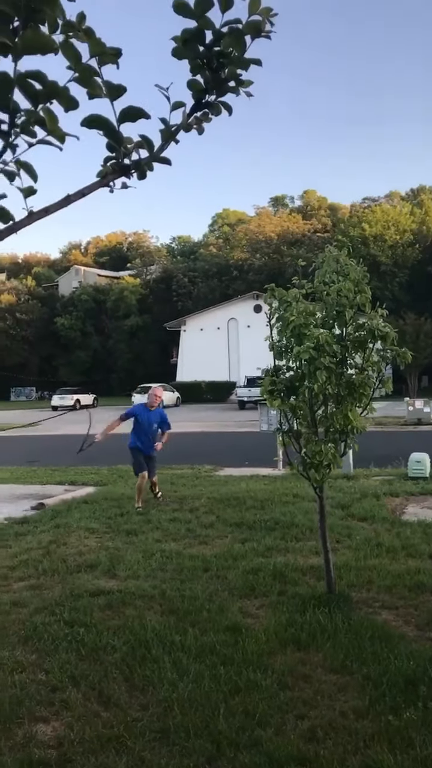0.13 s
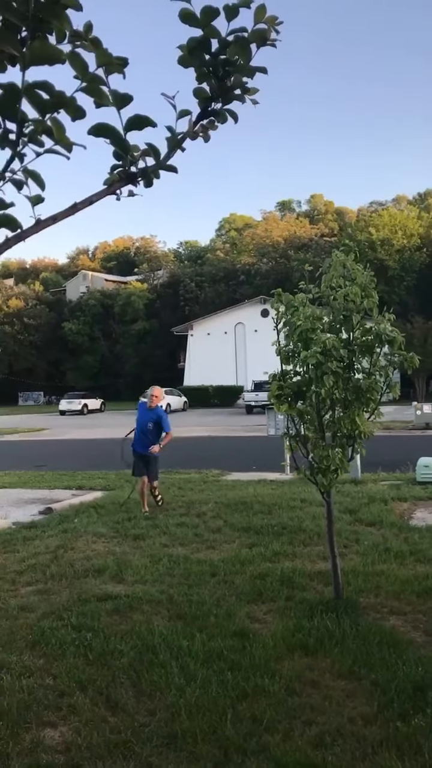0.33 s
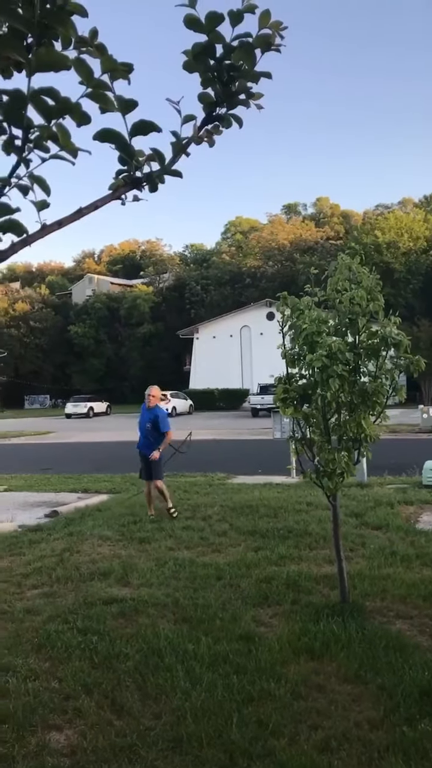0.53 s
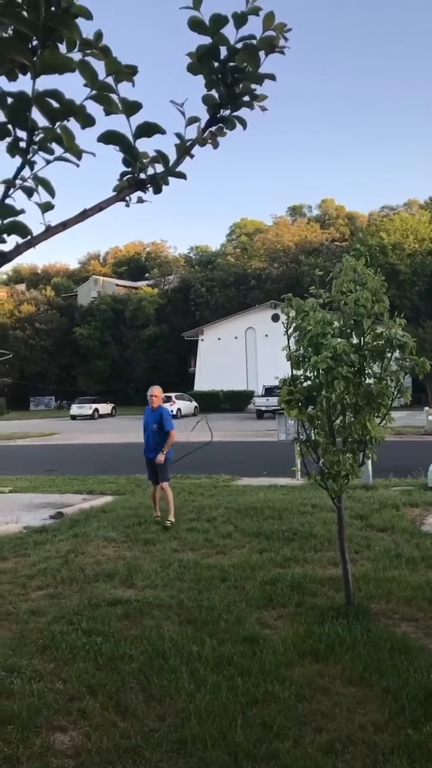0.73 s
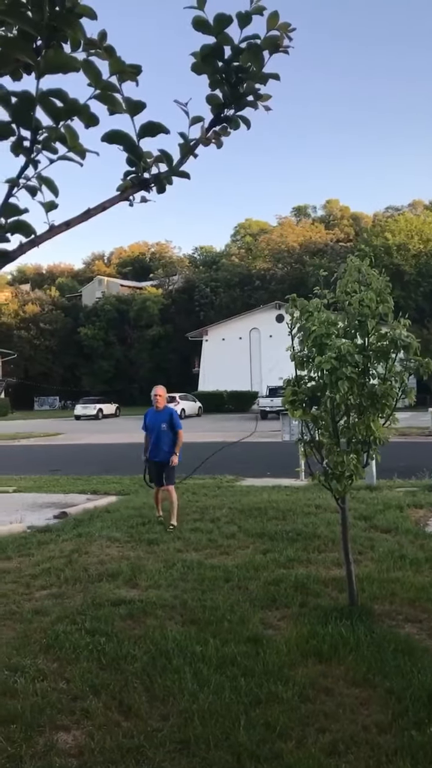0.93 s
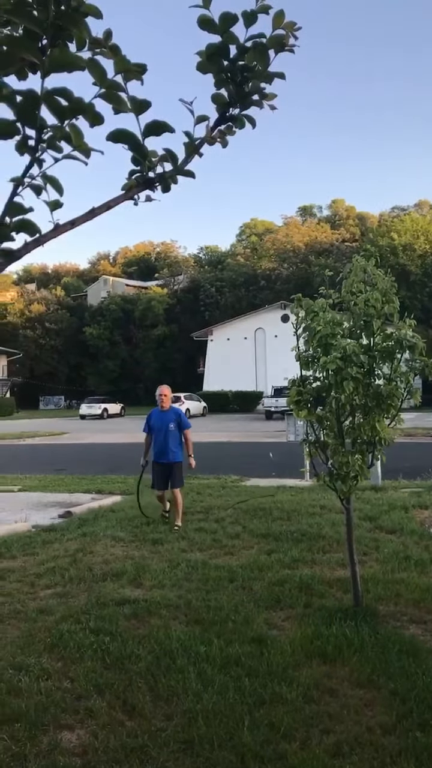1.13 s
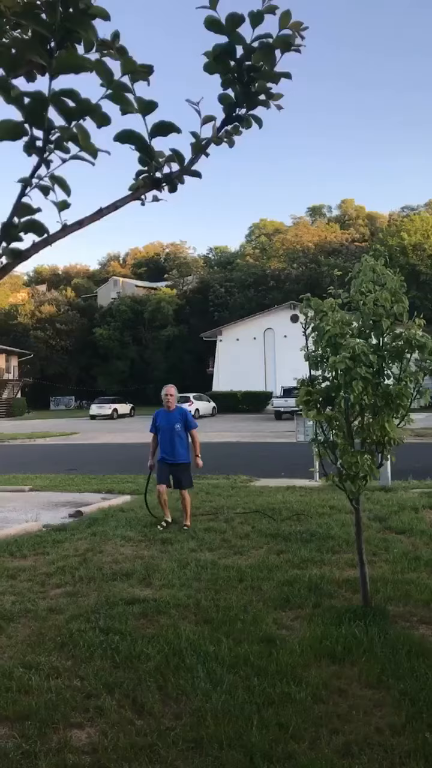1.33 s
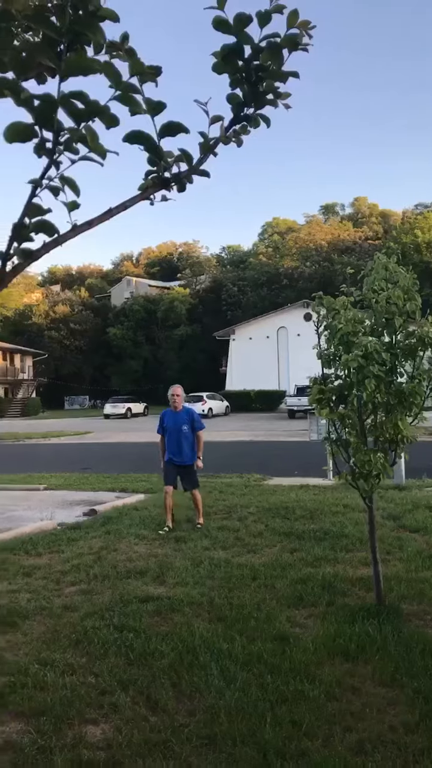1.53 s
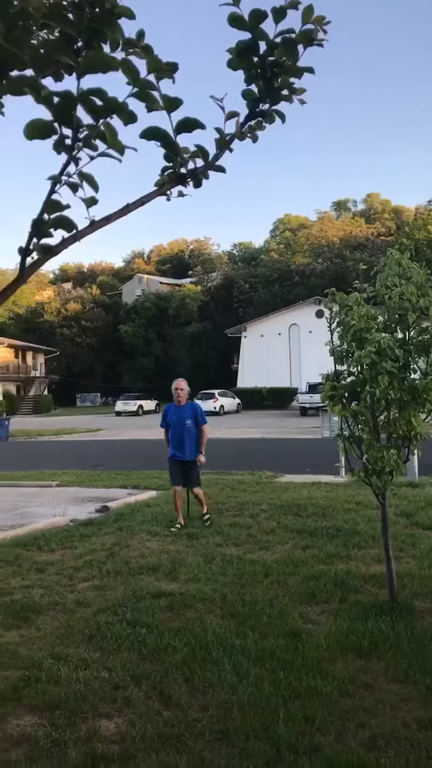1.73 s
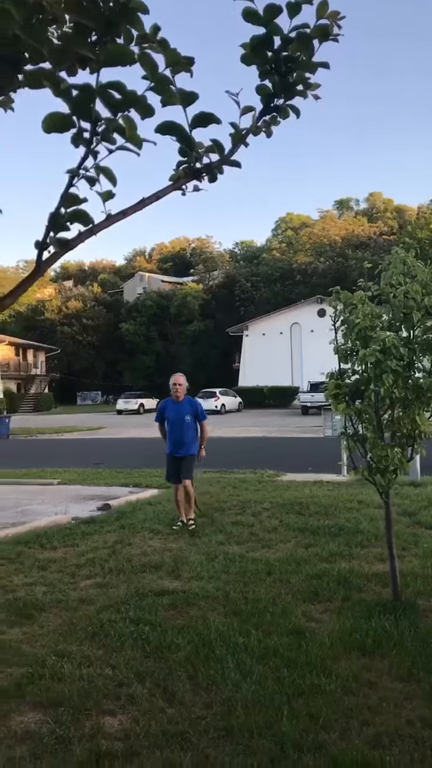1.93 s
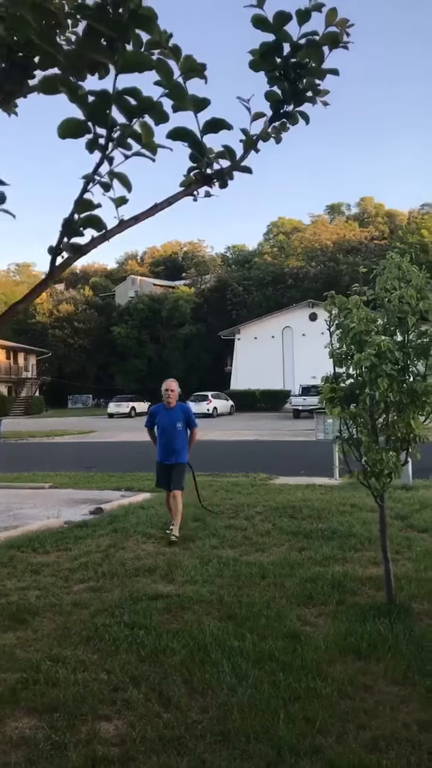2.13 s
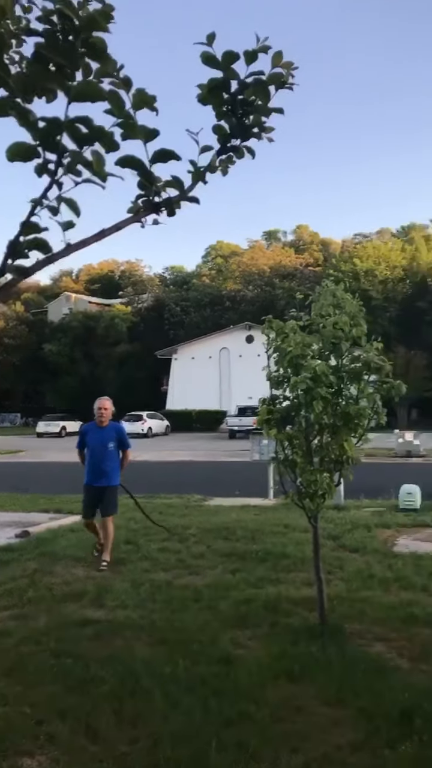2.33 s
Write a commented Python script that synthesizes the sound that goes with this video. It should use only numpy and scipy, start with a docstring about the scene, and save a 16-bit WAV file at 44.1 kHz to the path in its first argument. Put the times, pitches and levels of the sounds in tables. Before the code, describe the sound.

One loud whip crack in an open yard, then a hard wall echo and short fading reverberation

```python
"""A whip cracks once on a lawn, some metres from a phone: an N-shaped shock off the tip, doubled by a ground bounce.
The lash swishes just before, as shaped noise. Noise also forms the scatter off lawn and street, and the far echoes
of houses and trees, duller with time; a few short slaps come off single walls. Behind lie outdoor rumble, traffic
drones and a faint gliding bird whistle; grass rustles, a scuff and ticks are brief bands of noise.
The phone's gain control ducks everything at the crack, holds, then lets the level return steadily."""
import sys
import numpy as np
from scipy import signal
from scipy.fft import rfft, irfft
from scipy.io import wavfile
from scipy.ndimage import uniform_filter1d, minimum_filter1d

SR = 44100
rng = np.random.default_rng(int(sys.argv[2]) if len(sys.argv) > 2 else 0)


def transcribe(signal):
    """Save signal, clipped to [-1, 1], as a 16-bit WAV file at the path in sys.argv[1]."""
    frames = np.atleast_2d(signal).T
    limited = np.clip(frames, -1, 1)
    pcm = np.round(limited * 32767).astype(np.int16)
    wavfile.write(sys.argv[1], SR, pcm)


N = 110205

# All levels stand ahead of the phone's gain control. Colours are relative: each noise is scaled to rms 1.

# colour of the distant rumble and wind: columns [frequency_hz, density_db]
RUMBLE_COLOUR = [(15, -22), (28, -6), (38, 1), (58, 2), (100, -6), (220, -4.5), (360, -10.5), (530, -19),
                 (900, -19), (1700, -29.5), (2600, -35.5), (4300, -45), (5700, -43), (7500, -47),
                 (15500, -53)]
# rumble level over time, added to RUMBLE_DB: columns [time_s, level_db]
RUMBLE_COURSE = [(0, -1), (.9, 3.5), (1.3, 5.5), (1.6, 0), (1.9, -1.5), (2.4, -1)]
# gain of the rumble's low mids over time: columns [time_s, gain_db]
LOW_MID_COURSE = [(0, -7), (1.1, -2.5), (1.55, -0.5), (2.2, -3), (2.5, -3)]
RUMBLE_DB, WAVER_DB = -39.5, 0.6
LOW_MID_HZ, LOW_MID_WIDTH_OCT = 252, 0.79

# drones of far traffic: columns [peak_s, level_db, rise_s, fall_db_per_s, pitch_hz, width_octaves]
TRAFFIC_DRONES = [(1.52, -48.5, .13, 22.5, 355.1, .015), (2.2, -46, 0.15, 57, 223, .09)]

# faint bird chirps: columns [middle_s, level_db, width_s, pitch_hz]
BIRD_CHIRPS = [(2.197, -66, 0.0091, 3270), (2.243, -57, 0.012, 3400)]
CHIRP_GLIDE_HZ_PER_S, CHIRP_WOBBLE_HZ = -2000, 130  # the wobble is an rms

# soft rustles of grass and leaves: columns [peak_s, level_db, rise_s, fall_db_per_s]
GRASS_RUSTLES = [(.08, -64, .03, 30), (.97, -51, 0.043, 52), (1.07, -43.5, .04, 88), (1.25, -58.5, .02, 70),
                 (1.47, -59.5, 0.045, 195), (1.79, -68, .03, 100), (1.94, -67.5, 0.017, 153),
                 (2.37, -60, 0.011, 163)]
# colour of the rustles: columns [frequency_hz, density_db]
RUSTLE_COLOUR = [(1500, -31), (4000, -6), (5600, 5.5), (7500, -4), (10000, -3.5), (12000, 2), (15500, -3)]
# thin brush of the lash over grass: columns [peak_s, level_db, rise_s, fall_db_per_s]
LASH_BRUSH = [(1.11, -46, .014, 300)]
BRUSH_HZ, BRUSH_WIDTH_OCT = 5440, .06
# colour of the scuff: columns [frequency_hz, density_db]
SCUFF_COLOUR = [(600, -29), (1400, -6.5), (3300, 5.5), (4500, -3), (6000, -3.5), (8600, -3), (10500, -12.5),
                (15000, -12)]
SCUFF_S, SCUFF_LENGTH_S, SCUFF_DB, SCUFF_DECAY_S = 2.312, 0.023, -43.5, 0.0083
# small ticks and snaps: columns [start_s, level_db, centre_hz, width_octaves, decay_s]
SMALL_TICKS = [(1.0585, -29, 4200, .55, 0.0025), (1.787, -56, 9000, 0.79, 0.0018),
               (1.947, -51, 2700, 0.53, 0.0035), (2.0257, -57, 3500, 0.8, .003),
               (2.3712, -36, 1600, 0.54, 0.0033), (2.438, -51, 7500, .5, 0.0017)]

# wide echoes from houses and the wooded hill: columns [peak_s, level_db, rise_s, fall_db_per_s]
WIDE_ECHOES = [(.50, -20.5, 0.036, 45), (.585, -22, 0.041, 90), (.67, -28, 0.031, 35), (.83, -29, .06, 47),
               (1.02, -27.5, .05, 81)]
# colour of the wide echoes: columns [frequency_hz, density_db]
ECHO_COLOUR = [(150, -23), (500, -24), (900, -14.5), (1400, -6), (2200, -0.5), (2900, -1.5), (4000, -14.5),
               (5800, -14), (9000, -21), (15000, -29)]
# sharp returns from single walls: columns [start_s, level_db, decay_s]
WALL_SLAPS = [(.378, -7, 0.0038), (0.466, -24, 0.0041), (.583, -17, 0.0045), (.664, -25, .004),
              (0.822, -28, .004)]
SLAP_HZ, SLAP_WIDTH_OCT = 2000, 0.51
ECHO_FLICKER_DB, ECHO_FLICKER_HZ = 1, 45
AIR_DB_PER_S_KHZ = 6.5  # treble lost on the way to far reflectors

# colour of the scattered crack: columns [frequency_hz, density_db]
SCATTER_COLOUR = [(40, -10), (150, -17), (400, -13), (750, -8.5), (1200, -4), (2100, 1.5), (2800, 0),
                  (3500, -6), (4300, -14.5), (5800, -8.5), (7500, -15.5), (9200, -12), (10700, -19),
                  (15500, -16.5)]
LAWN_DB, LAWN_HOLD_S, LAWN_FALL_DB_PER_S = 0.7, 0.04, 379
STREET_DB, STREET_HOLD_S, STREET_FALL_DB_PER_S = -13.5, 0.11, 231
SCATTER_GRAIN, TREBLE_FALL_DB_PER_S_KHZ = 0.067, 8

# air torn by the lash just before the crack: columns [middle_s, level_db, width_s]
LASH_SWISHES = [(.2375, -27, 0.0014), (.2475, -29, .0018), (0.2374, -41.5, .008)]
# colour of the swish: columns [frequency_hz, density_db]
SWISH_COLOUR = [(60, 8), (300, -4), (800, 0.5), (2400, -1.5), (4000, -17), (9000, -14), (16000, -25)]

# the shock at the microphone: arrival, length of the N wave, peak of the whole
CRACK_S, SHOCK_MS, SHOCK_DB = .2499, .33, 14
GROUND_LAG_S, GROUND_DB = .0018, -1.5  # bounce relative to the direct path
MIC_RING_HZ, MIC_Q = 2200, 2.4
SHOCK_EDGE_DB, EDGE_RISE_HZ = -10, 7000  # share beside the ring; it rises above this frequency

# the phone
LIMIT_DB, HOLD_S, RECOVER_DB_PER_S = -2.8, 0.56, 17.5
TOP_HZ = 15550


def undb(db):
    """Amplitude ratio of a level in dB."""
    return 10 ** (np.asarray(db) / 20)


def clock():
    """Time of every sample, s."""
    return np.arange(N) / SR


def freqs():
    """Frequency of every spectral bin, Hz, at least 1."""
    return np.maximum(np.arange(N // 2 + 1) * SR / N, 1)


def noise(colour, grain=0):
    """Coloured noise of rms 1; grain makes its samples more uneven, like a mass of clicks."""
    hz, db = np.array(colour).T
    white = rng.standard_normal(N) * np.exp(grain * rng.standard_normal(N))
    gain = undb(np.interp(np.log(freqs()), np.log(hz), db))
    y = irfft(rfft(white) * gain, N)
    return y / y.std()


def bell(x, hz, octaves):
    """Keeps a bell-shaped band around hz."""
    gain = np.exp(-.5 * (np.log2(freqs() / hz) / octaves) ** 2)
    return irfft(rfft(x) * gain, N)


def band(hz, octaves):
    """Noise of rms 1 in one bell-shaped band."""
    y = bell(rng.standard_normal(N), hz, octaves)
    return y / y.std()


def dull(x, db_per_khz, count=14):
    """Tilts the sound towards the bass about 2 kHz, by an amount that changes in time."""
    centres = np.geomspace(200, 16000, count)
    spectrum = rfft(x)
    out = 0
    for hz, share in zip(centres, np.eye(count)):
        # overlapping triangular bands add up to the whole spectrum
        part = irfft(spectrum * np.interp(freqs(), centres, share), N)
        out = out + part * undb(-db_per_khz * (hz / 1e3 - 2))
    return out


def burst(start, decay):
    """Sudden start, exponential decay."""
    age = clock() - start
    return (age >= 0) * np.exp(-np.abs(age) / decay)


def hump(middle, width):
    """Smooth rise and fall about a middle, Gaussian in time."""
    return np.exp(-.5 * ((clock() - middle) / width) ** 2)


def swells(rows):
    """Overlapping swells summed in power, each with a smooth rise and a steady fall in dB."""
    power = 0
    for peak, db, rise, fall in rows:
        age = clock() - peak
        falling = undb(db - fall * np.maximum(age, 0))
        rising = np.exp(-.5 * (np.minimum(age, 0) / rise) ** 2)
        power = power + (falling * rising) ** 2
    return np.sqrt(power)


def outdoors(count=24):
    """Low rumble of wind and far traffic: coloured noise with moving low mids and a slight waver."""
    t = clock()
    air = noise(RUMBLE_COLOUR)
    low_mid_gain = undb(np.interp(t, *np.array(LOW_MID_COURSE).T))
    air = air + bell(air, LOW_MID_HZ, LOW_MID_WIDTH_OCT) * (low_mid_gain - 1)
    waver = np.interp(t, np.linspace(0, t[-1], count), rng.standard_normal(count))
    course = np.interp(t, *np.array(RUMBLE_COURSE).T)
    return air * undb(RUMBLE_DB + course + WAVER_DB * waver)


def traffic():
    """Far low drones: narrow noise bands that swell and fade."""
    return sum(swells([swell]) * band(hz, octaves) for *swell, hz, octaves in TRAFFIC_DRONES)


def bird():
    """Short whistles: sines whose pitch falls slightly, with a quick irregular wobble."""
    out = 0
    wobble = CHIRP_WOBBLE_HZ * band(120, 1)
    for middle, db, width, hz in BIRD_CHIRPS:
        pitch = hz + CHIRP_GLIDE_HZ_PER_S * (clock() - middle) + wobble
        phase = 2 * np.pi * np.cumsum(pitch) / SR
        out = out + undb(db) * hump(middle, width) * np.sqrt(2) * np.sin(phase)
    return out


def rustles():
    """Grass and leaves: swells of grainy noise, with one thin brush of the lash in a narrow band."""
    grass = swells(GRASS_RUSTLES) * noise(RUSTLE_COLOUR, grain=.55)
    return grass + swells(LASH_BRUSH) * band(BRUSH_HZ, BRUSH_WIDTH_OCT)


def scuff():
    """One brief scuff: grainy noise with a quick onset, a plateau and a short decay."""
    age = clock() - SCUFF_S
    decay = np.exp(-np.maximum(age - SCUFF_LENGTH_S, 0) / SCUFF_DECAY_S)
    return undb(SCUFF_DB) * np.clip(age / 0.0016, 0, 1) * decay * noise(SCUFF_COLOUR, grain=0.47)


def ticks():
    """Small ticks and snaps: noise bands that start suddenly and die within milliseconds."""
    return sum(undb(db) * burst(start, decay) * band(hz, octaves)
               for start, db, hz, octaves, decay in SMALL_TICKS)


def echoes():
    """Far houses and trees return the crack as flickering swells and short slaps, duller with time."""
    flicker = undb(ECHO_FLICKER_DB * band(ECHO_FLICKER_HZ, 0.88))
    wash = swells(WIDE_ECHOES) * flicker * noise(ECHO_COLOUR, grain=0.6)
    slap_level = sum(undb(db) * burst(start, decay) for start, db, decay in WALL_SLAPS)
    slaps = band(SLAP_HZ, SLAP_WIDTH_OCT) * slap_level
    return dull(wash + slaps, AIR_DB_PER_S_KHZ * np.maximum(clock() - CRACK_S, 0))


def scatter():
    """Dense returns off the lawn, and weaker, longer ones off the street; the treble falls faster."""
    age = clock() - CRACK_S
    late = np.maximum(age - LAWN_HOLD_S, 0)
    lawn = undb(LAWN_DB - LAWN_FALL_DB_PER_S * late)
    street = undb(STREET_DB - STREET_FALL_DB_PER_S * np.maximum(age - STREET_HOLD_S, 0))
    onset = np.clip(age / 0.0036, 0, 1)
    returns = dull(noise(SCATTER_COLOUR, SCATTER_GRAIN), TREBLE_FALL_DB_PER_S_KHZ * late)
    return onset * np.hypot(lawn, street) * returns


def swish():
    """The lash tears the air as it unrolls: coloured noise in short humps."""
    return noise(SWISH_COLOUR) * sum(undb(db) * hump(middle, width) for middle, db, width in LASH_SWISHES)


def shock():
    """The tip's N wave and its bounce off the lawn; both ring the microphone briefly."""
    f = freqs()
    w = np.pi * f * SHOCK_MS / 1e3
    n_wave = 1j * (np.sin(w) - w * np.cos(w)) / w ** 2 * np.exp(-1j * w)  # spectrum of the N shape
    ring = 1 / (1 + 1j * MIC_Q * (f / MIC_RING_HZ - MIC_RING_HZ / f))
    edge = undb(SHOCK_EDGE_DB) * (1 + 1j * f / EDGE_RISE_HZ)
    paths = 1 + undb(GROUND_DB) * np.exp(-2j * np.pi * f * GROUND_LAG_S)
    arrival = np.exp(-2j * np.pi * f * CRACK_S)
    y = irfft(n_wave * (ring + edge) * paths * arrival, N)
    return undb(SHOCK_DB) * y / np.abs(y).max()


def scene():
    """Everything at the microphone, from the background to the crack, in one channel."""
    background = outdoors() + traffic() + bird()
    near = rustles() + scuff() + ticks()
    crack = echoes() + scatter() + swish() + shock()
    return (background + near + crack)[None]


def gain_control(x):
    """Turns down at once on a peak, holds, then recovers at a steady rate in dB."""
    over = np.maximum(20 * np.log10(np.abs(x) + 1e-9) - LIMIT_DB, 0)
    half = int(HOLD_S * SR / 2)
    # the window looks back over the hold time for the largest excess
    held = -minimum_filter1d(-over, 2 * half + 1, origin=half, mode="constant")
    ramp = RECOVER_DB_PER_S * clock()
    cut = np.maximum.accumulate(held + ramp) - ramp
    # about 1 ms of smoothing, begun just ahead of the peak
    gain_db = uniform_filter1d(minimum_filter1d(-cut, size=45), size=45)
    return x * undb(gain_db)


def record(dry):
    """The phone's gain control, then its steep treble cut-off."""
    cutoff = signal.ellip(10, .2, 80, TOP_HZ, fs=SR, output="sos")
    return signal.sosfilt(cutoff, gain_control(dry[0]))[None]


dry = scene()
out = record(dry)
transcribe(out)
```